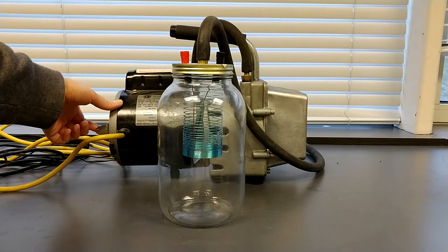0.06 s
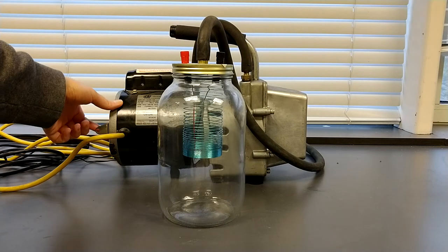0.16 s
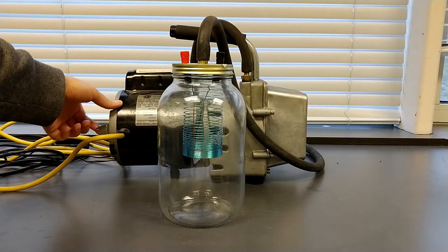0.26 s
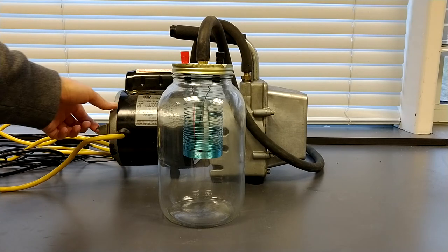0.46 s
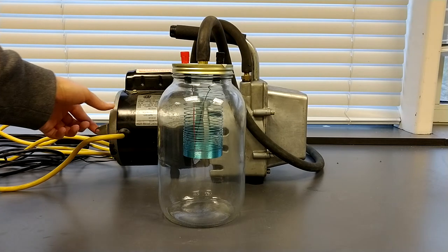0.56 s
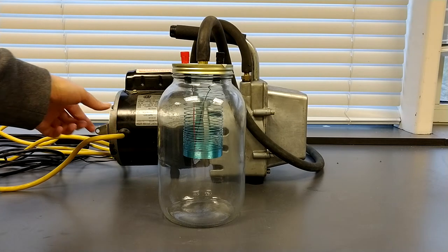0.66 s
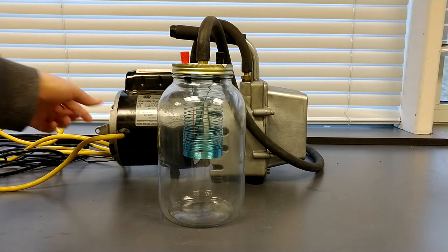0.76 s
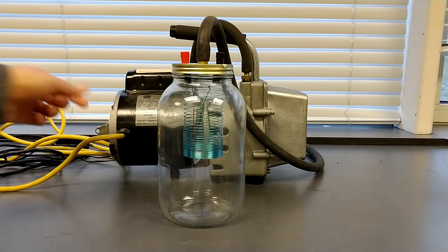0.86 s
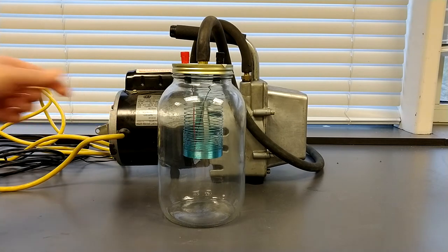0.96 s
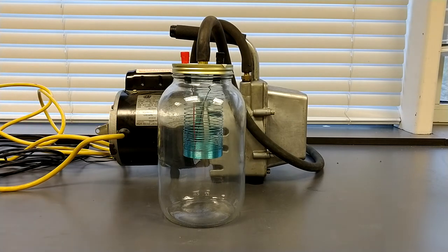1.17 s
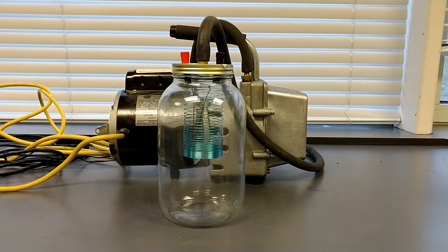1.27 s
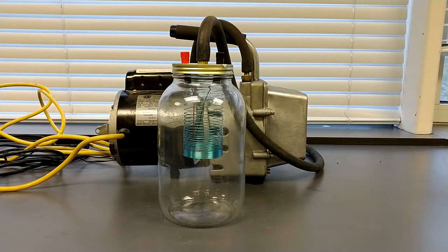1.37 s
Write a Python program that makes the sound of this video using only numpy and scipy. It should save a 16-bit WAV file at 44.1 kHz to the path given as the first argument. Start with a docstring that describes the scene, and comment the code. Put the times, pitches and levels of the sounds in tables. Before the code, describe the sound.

Close up in a quiet room, an electric vacuum pump jolts into motion with a burst of metallic clatter, then runs more softly, humming and ticking rapidly while its gurgle and hiss ease off.

```python
"""A soft switch thump, a scrape, then a loud rattle: a rotary vane vacuum pump gulps its first air.
It settles on its bench in a quiet room. The vanes drone and throb, oil churns in the ringing casing,
and the exhaust fizzes while its valve ticks about once a turn (two vane strokes).
Layers are built as a direct and a diffuse channel, then spread to left and right."""
import sys
import numpy as np
from scipy import signal
from scipy.fft import rfft, irfft, next_fast_len
from scipy.io import wavfile
from scipy.ndimage import map_coordinates

SR = 44100
rng = np.random.default_rng(int(sys.argv[2]) if len(sys.argv) > 2 else 0)


def output_pcm(signal):
    """Save a mono or channel-first signal as 16-bit PCM at the path in sys.argv[1].

    Samples are clipped to [-1, 1] before scaling.
    """
    pcm = np.clip(np.atleast_2d(signal).T, -1, 1) * 32767
    wavfile.write(sys.argv[1], SR, np.round(pcm).astype(np.int16))


N = 61739

# Swell of the start-up clatter: time_s, mid_db, upper_mid_db, treble_db
RATTLE_SWELL = [(.10, -99, -110, -110), (.143, -78, -83, -93), (.17, -53.5, -61, -63),
                (.195, -64, -50, -45), (.23, -47.5, -49.5, -52.5), (.243, -36.5, -30, -35),
                (.27, -28, -26, -27.5), (.3, -25.5, -35, -32), (.345, -26.5, -28, -35.5),
                (.372, -27.5, -35, -31), (.395, -33, -42.5, -40), (.45, -41.5, -50, -46),
                (.6, -52, -85, -94)]
# Broad, hard clatter colour: freq_hz, level_db
RATTLE_EQ = [(250.0, -15.5), (420.0, -32), (600.0, 2.5), (1000.0, -6.5), (1400.0, -13), (1800.0, -2.5),
             (2200.0, -5), (2800.0, -3), (3600.0, -4), (4400.0, -1.5), (5400.0, -14), (7200.0, -10),
             (9000.0, -19.5), (11000.0, -16), (14000.0, -20), (15500.0, -29)]
# Hard knocks within the clatter: start_s, level_db
KNOCK_HITS = [(.287, -18.5), (.2935, -21), (.3145, -23), (.3345, -22), (.340, -22.5), (.357, -26)]
# Clanky knock colour: freq_hz, level_db
KNOCK_EQ = [(300, -22.5), (600, -12.5), (900, -6), (1400, 7.5), (1750, -7.5), (2100, 5), (2450, -2.5),
            (2850, 2.5), (3200, -3), (3800, -6), (4800, -18), (7200, -3.5), (9000, -21), (14000, -23),
            (15500, -36)]
def rattle(ring_db=.5, body_db=-3.5, low_hz=2400, high_hz=4800):
    """The first gulp of air: dense clatter and a few hard knocks ring the casing."""
    mid, upper_mid, treble = amp(curves(RATTLE_SWELL))
    impacts = grains(12000, spread_db=0.5)
    clatter = amp(body_db) * coloured(impacts, RATTLE_EQ)
    clatter += amp(ring_db) * casing(impacts, settled=False)
    below = lambda hz, edge_hz: 1 / (1 + (hz / edge_hz) ** 10)
    bands = mid * unit(filtered(clatter, lambda hz: below(hz, low_hz)))
    bands += upper_mid * unit(filtered(clatter, lambda hz: below(hz, high_hz) - below(hz, low_hz)))
    bands += treble * unit(filtered(clatter, lambda hz: 1 - below(hz, high_hz)))
    knocks = noise() * bursts(KNOCK_HITS, decay_s=0.005, attack_s=0.0018)
    return bands + amp(6) * coloured(knocks, KNOCK_EQ) + amp(2.5) * casing(knocks, settled=False)


# Double clack that ends the start-up: start_s, level_db
CLACK_HITS = [(.3635, -19), (.369, -26)]
# Bright clack colour: freq_hz, level_db
CLACK_EQ = [(2000, -11), (4800, -17), (6000, 2), (8500, 2), (9500, -3), (11000, -5), (12300, -1),
            (13800, -1), (15500, -16)]
def clacks():
    """The pump breaks free with two bright clacks."""
    return coloured(noise() * bursts(CLACK_HITS, decay_s=0.0056, attack_s=0.00087), CLACK_EQ)


# Rasps leading into the rattle: start_s, level_db
SCRAPE_HITS = [(.187, -37.5), (.197, -35.5), (.212, -54), (.2355, -22), (.244, -23.5)]
# Narrow, bright rasp colour: freq_hz, level_db
SCRAPE_EQ = [(2000, -18), (3300, -31), (3700, -3.5), (3850, 1), (4150, -11), (6000, -46)]
def scrapes():
    """The motor scrapes as it takes hold, ringing one part of the casing."""
    return coloured(noise() * bursts(SCRAPE_HITS, decay_s=0.0061, attack_s=0.0012), SCRAPE_EQ)


# Ticks of the switch, then the exhaust valve: start_s, level_db
TICK_HITS = [(.147, -55.5), (.164, -42.5), (.174, -47), (0.4143, -31), (0.478, -31), (0.508, -36),
             (0.577, -33), (0.6086, -38), (0.6318, -33.5), (0.6748, -27.5), (0.71, -29.5), (.746, -43),
             (0.7826, -28.5), (0.8007, -30.5), (0.8378, -23), (.873, -31), (0.9088, -25), (0.9462, -27.5),
             (0.9807, -27), (1.0179, -23.5), (1.0535, -25), (1.0889, -29), (1.1249, -26.5), (1.161, -24.5),
             (1.1957, -27), (1.232, -27.5), (1.2673, -24)]
# Crisp tick colour: freq_hz, level_db
TICK_EQ = [(1500, 3.5), (2300, -3), (2850, 3), (3900, 0.5), (4800, 4.5), (5900, -1.5), (6600, 9.5),
           (7300, 5.5), (8500, 7.5), (9600, 0.5), (11200, 0.5), (12300, -2.5), (13500, 2.5), (15500, -13)]
def ticks(snap_db=9, wall_db=-9.5, reseat_db=-14, ring_db=-7, wall_s=.003, reseat_s=.0255):
    """Each tick is a sharp snap, the wall's answer and a soft reseating; all ring the valve."""
    later = lambda delay_s: [(s + delay_s, db) for s, db in TICK_HITS]
    direct_only = np.array([[1], [0]])
    snap = amp(snap_db) * bursts(TICK_HITS, decay_s=.0009, attack_s=.0005) * direct_only
    wall = amp(wall_db) * bursts(later(wall_s), decay_s=.008, attack_s=.0005)
    reseat = amp(reseat_db) * bursts(later(reseat_s), decay_s=.0023, attack_s=.00097)
    clicks = noise() * (snap + wall + reseat)
    return coloured(clicks, TICK_EQ) + amp(ring_db) * valve(clicks)


# Spin-up of the pump: time_s, stroke_rate_hz
SPIN_UP = [(0.15, 5), (.3, 36), (.4, 46), (.45, 50.5), (.5, 53), (.6, 54.4), (.72, 55.15), (1.0, 55.4),
           (1.4, 55.5)]
# Partials of the vane strokes: harmonic_number, relative_db
VANE_PARTIALS = [(1, 2), (2, 2), (3, 0), (5, -3), (6, -9), (8, -6), (9, -11), (10, 1), (11, -8), (12, -.5),
                 (13, -1), (14, 0), (15, .5), (16, -.5), (17, 0), (18, -9), (21, -10), (23, -3), (24, -5),
                 (25, -1), (29, -8), (30, 2), (31, -7)]
# Swell of the low hum and the whirr above it: time_s, hum_db, whirr_db
DRONE_SWELL = [(.15, -70, -80), (.3, -55, -58), (.45, -50, -50), (.52, -47, -42.5), (.6, -45, -42),
               (.75, -46, -42.5), (1.0, -46, -42.5), (1.25, -46, -43), (1.4, -46, -45)]
WAVER_DEPTH = .2  # share of a tone's amplitude
def drone(hum_partials=5, jitter_strokes=.002, panel_hz=700, panel_width_hz=9, panel_db=11):
    """Vane strokes make a hum and a whirr; partials swell as they meet a panel's resonance."""
    phase = 2 * np.pi * (strokes() + jitter_strokes * wobble(25.9))
    stroke_hz, = curves(SPIN_UP)
    hum, whirr = amp(curves(DRONE_SWELL))
    partials = []
    for harmonic, db in VANE_PARTIALS:
        panel = amp(panel_db / (1 + ((harmonic * stroke_hz - panel_hz) / panel_width_hz) ** 2))
        waver = 1 + WAVER_DEPTH * wobble(15.63)
        partials.append(amp(db) * panel * waver * np.cos(harmonic * phase + 2 * np.pi * rng.random()))
    return hum * unit(sum(partials[:hum_partials])) + whirr * unit(sum(partials[hum_partials:]))


# Weight of the throb: time_s, level_db
THROB_SWELL = [(.38, -39), (.41, -35.5), (.46, -42), (.5, -36), (.68, -35.5), (.73, -44), (.81, -44),
               (.85, -37.5), (1.02, -40), (1.11, -36), (1.27, -37), (1.4, -38.5)]
def throb(start_s=.3748, cycle_s=.0887, lag_s=.036, pitch_hz=143, half_length_s=.0095):
    """Soft low beats of the pump, a limping pair in each slow cycle."""
    first_beats = np.arange(start_s, N / SR, cycle_s)
    age = clock() - np.concatenate([first_beats, first_beats + lag_s])[:, None]
    beats = np.exp(-(age / half_length_s) ** 2 / 2) * np.cos(2 * np.pi * pitch_hz * age)
    return amp(curves(THROB_SWELL)[0]) * beats.sum(0)


# Churn easing off as the pump settles: time_s, level_db
CHURN_SWELL = [(.4, -37.5), (.44, -35), (.6, -37), (.9, -40.5), (1.25, -45), (1.4, -48)]
# Hollow churn colour: freq_hz, level_db
CHURN_EQ = [(150, -22.5), (270, -5), (400, -18), (560, -9), (720, -1), (880, -3), (1100, -5.5), (1380, 4),
            (1650, -11.5), (1850, -9.5), (2100, -2.5), (2600, -45.5), (4000, -56.5)]
def churn(pulse_db=4, body_db=-4, ring_db=-6):
    """Oil and air slap about, surging twice a stroke, and ring the casing."""
    surge = amp(pulse_db * np.cos(4 * np.pi * strokes()))
    slaps = unit(grains(4000, spread_db=0.5) * surge) * amp(curves(CHURN_SWELL)[0]) * running()
    return amp(body_db) * coloured(slaps, CHURN_EQ) + amp(ring_db) * casing(slaps, settled=True)


# Fade of the exhaust hiss: time_s, level_db
HISS_FADE = [(0.4, -43.5), (0.744, -43.5), (1.108, -55), (1.27, -52), (1.4, -54.5)]
# Fizzy hiss colour: freq_hz, level_db
HISS_EQ = [(2000.0, -8), (2400.0, 3.5), (2900.0, 4.5), (3500.0, -6), (4400.0, 9.5), (5200.0, -12),
           (5900.0, -4), (6500.0, 2), (7300.0, 5), (8500.0, -17), (9600.0, -0.5), (11000.0, -2),
           (13500.0, -3), (14700.0, -5), (15500.0, -52)]
def exhaust(trim_db=2, turn_db=1.0, stroke_db=1.0, ring_db=-8):
    """Fizzing exhaust air swells with each turn, puffs with each stroke and rings the valve."""
    phase = 2 * np.pi * strokes()
    puff = amp(turn_db * np.cos(phase / 2) + stroke_db * np.cos(phase))
    air = unit(grains(5700, spread_db=5.0) * puff) * amp(curves(HISS_FADE)[0] + trim_db) * running()
    return coloured(air, HISS_EQ) + amp(ring_db) * valve(air)


# Ring of the casing: pitch_hz, width_hz, rattled_db, settled_db
CASING_MODES = [(570, 20, -6, -5), (698, 22, -6, -4), (845, 50, -14, -11), (1268, 18, -2, -7),
                (1320, 18, -1, -12), (1362, 18, 5, 2), (1418, 18, 4, -4), (1455, 18, 1, -11),
                (1525, 18, 3, -11), (1667, 22, -14, -4), (2062, 18, -4, -14), (2117, 18, -3, -8),
                (2838, 18, 4, -7), (3507, 15, 1, -14), (3548, 15, 3, -14), (3770, 60, -8, -22),
                (4288, 25, -10, -17), (5720, 40, -13, -17), (6495, 28, -8, -13), (7244, 45, -8, -11),
                (7630, 50, -12, -22), (8460, 60, -13, -10)]
def casing(drive, settled):
    """The casing rings when struck; its narrower resonances last longer."""
    t = clock()[:SR // 4]
    ring = 0
    for hz, width_hz, rattled_db, settled_db in CASING_MODES:
        gain = amp(settled_db if settled else rattled_db) * width_hz
        ring += gain * np.exp(-np.pi * width_hz * t) * np.cos(2 * np.pi * hz * t)
    return excite(ring, drive)


# Ring of the exhaust valve: pitch_hz, level_db, t60_s
VALVE_MODES = [(2880, 0, .04), (3420, -2, .02), (5870, 3, .04), (6490, -6, .04), (7246, -3, .04),
               (8490, 1, .03), (8700, 0, .03)]
def valve(drive):
    """The exhaust valve answers with a brief, high ring."""
    t = clock()[:SR // 8]
    ring = sum(amp(db - 60 * t / t60) * np.sin(2 * np.pi * hz * t) for hz, db, t60 in VALVE_MODES)
    return excite(ring, drive)


# Pings of the motor housing: start_s, pitch_hz, level_db
JOLT_PINGS = [(.164, 1222, -45.5), (.178, 602, -42.5)]
def jolts():
    """The motor housing pings softly as it jerks into motion."""
    return sum(bursts([(s, db)], decay_s=.019, attack_s=.002) * np.sin(2 * np.pi * hz * (clock() - s))
               for s, hz, db in JOLT_PINGS)


# Whines off the harmonic series, at full speed: pitch_hz, level_db
WHINE_TONES = [(572, -54), (991, -50)]
def whine(start_s=.52, rise_s=.25):
    """Two thin motor tones follow the speed and fade in as it levels off."""
    motor_time = strokes() / SPIN_UP[-1][1]
    tone = lambda hz: unit((1 + WAVER_DEPTH * wobble(9.5)) * np.sin(2 * np.pi * hz * motor_time))
    return fade_in(start_s, rise_s) * sum(amp(db) * tone(hz) for hz, db in WHINE_TONES)


# Thumps of the switch and the motor taking hold: start_s, level_db
THUMP_HITS = [(.107, -42.5), (.117, -60), (.146, -41.5), (.188, -32)]
# Dull thump colour: freq_hz, level_db
THUMP_EQ = [(40, -20), (110, 4), (160, 7.5), (300, -12.5), (480, -15.5), (620, -2.5), (750, -15),
            (1200, -21), (2500, -37), (9000, -45)]
# Low rumble colour: freq_hz, level_db
RUMBLE_EQ = [(35, -55), (60, -10), (95, 0.5), (120, -5.5), (150, 3.5), (175, 3.5), (195, -5), (250, -1.5),
             (380, -9.5), (600, -28.5)]
def bench(rumble_db=-43):
    """The bench takes the thumps of starting, then rumbles under the motor."""
    rumble = amp(rumble_db) * fade_in(start_s=0.14, rise_s=0.11) * coloured(noise(), RUMBLE_EQ)
    thumps = noise() * bursts(THUMP_HITS, decay_s=0.016, attack_s=0.0039)
    return rumble + coloured(thumps, THUMP_EQ)


# Dark room tone: freq_hz, level_db
AIR_EQ = [(25, -28), (50, -11), (90, -8), (130, -2.5), (160, 9), (200, -11.5), (250, -2.5), (380, -19),
          (600, -25), (1400, -35.5), (2200, -43), (5000, -44), (15000, -52.5)]
def room_air(level_db=-52.5):
    """The room's own steady murmur of air."""
    return amp(level_db) * unit(coloured(noise(), AIR_EQ))


# Decay of the room: freq_hz, t60_s
ROOM_DECAY = [(200, 0.27), (2000, 0.065), (12000, 0.027)]
def room_tail(x):
    """Short diffuse reflections whose treble dies first."""
    hz, t, spectrum = signal.stft(rng.standard_normal((2, SR // 2)), SR, nperseg=256)
    decay = amp(-60 * t / along(ROOM_DECAY, hz)[:, None])
    tail = signal.istft(spectrum * decay, SR, nperseg=256)[1]
    return signal.fftconvolve(x, tail / np.linalg.norm(tail[0]), axes=1)[:, :N]


# Likeness of left and right: freq_hz, coherence
STEREO_LIKENESS = [(60, 0.85), (170, 0.99), (320, 0.76), (550, 0.81), (1400, 0.96), (2000, 0.078),
                   (2350, 0.74), (2900, 0.35), (3550, 0.89), (4000, 0.063), (4500, 1), (5400, 0.16),
                   (7200, 0.29), (10000, 0.18), (14000, 0.52)]
# Lean of the image: freq_hz, left_minus_right_db
STEREO_BALANCE = [(50, 10), (100, 9), (190, 7), (380, 2.5), (1100, 1), (1700, 6), (2050, -1.5),
                  (3500, -0.5), (4600, 0.5), (6000, 5.5), (7400, 8.5), (9000, 7), (11000, 1.5), (14000, -2)]
# Phase between the sides: freq_hz, left_lead_rad
STEREO_PHASE = [(60, -2.2), (110, -1.55), (400, -1.35), (600, -.1), (1400, 0), (1850, .2), (2300, 3.2),
                (2700, 3.4), (3050, 6.3), (3900, 6.4), (4200, 9.3), (5300, 9.6), (5800, 12.9), (7000, 16),
                (8300, 19.2), (9600, 15.7), (10600, 12.6), (12000, 9.5), (13300, 6.3), (14300, 3.3)]
def spread(pair):
    """Direct sound becomes the mid, diffuse sound the side; each band leans left or right."""
    def width(hz):
        angle = np.arccos(np.clip(along(STEREO_LIKENESS, hz), 0, .99)) / 2
        return np.array([np.cos(angle), np.sin(angle)])

    def pan(hz):
        lean = amp(np.outer([.5, -.5], along(STEREO_BALANCE, hz)))
        shift = np.exp(1j * np.outer([.5, -.5], along(STEREO_PHASE, hz)))
        return shift * lean / np.sqrt((lean ** 2).mean(0))

    mid, side = filtered(pair, width)
    return filtered(np.array([mid + side, mid - side]), pan)


def strokes():
    """Count of vane strokes so far."""
    return np.cumsum(curves(SPIN_UP)[0]) / SR


def running():
    """Fade-in as the pump gets going."""
    return fade_in(start_s=0.28, rise_s=0.045)


def fade_in(start_s, rise_s):
    """Straight ramp from 0 to 1."""
    return np.clip((clock() - start_s) / rise_s, 0, 1)


def bursts(hits, decay_s, attack_s):
    """Envelope of blows that rise quickly and die away, summed in power."""
    hits = np.array(hits)
    age = np.maximum(clock() - hits[:, :1], 0)
    each = amp(hits[:, 1:]) * np.exp(-age / decay_s) * (1 - np.exp(-age / attack_s))
    return np.sqrt((each ** 2).sum(0))


def grains(per_second, spread_db):
    """Tiny random impacts of uneven size, rms 1."""
    impacts = noise() * (rng.random(N) < per_second / SR)
    sizes = amp(spread_db * np.clip(rng.standard_normal(N), -2, 2))
    return unit(impacts * sizes)


def noise():
    """Two unrelated white noises."""
    return rng.standard_normal((2, N))


def wobble(rate_hz):
    """A smooth random curve with rate_hz knots a second."""
    return map_coordinates(rng.standard_normal(int(N * rate_hz / SR) + 4), [clock() * rate_hz])


def coloured(x, eq, size=4096):
    """Shape x with an EQ curve scaled to unit energy."""
    gain = amp(along(eq, np.fft.rfftfreq(size, 1 / SR)))
    cepstrum = irfft(np.log(gain + 1e-6))
    # Minimum phase: nothing rings ahead of a hit.
    cepstrum[1:size // 2] *= 2
    cepstrum[size // 2 + 1:] = 0
    return excite(irfft(np.exp(rfft(cepstrum))), x)


def excite(ring, drive):
    """Play drive through an impulse response scaled to unit energy."""
    return signal.fftconvolve(drive, ring[None] / np.linalg.norm(ring), axes=1)[:, :N]


def filtered(x, response):
    """Multiply the spectrum of x by response(hz)."""
    size = next_fast_len(N + SR // 2)
    return irfft(rfft(x, size) * response(np.fft.rfftfreq(size, 1 / SR)), size)[..., :N]


def along(points, hz):
    """Read (freq_hz, value) points on a log axis."""
    freqs, values = np.transpose(points)
    return np.interp(np.log(hz + 1), np.log(freqs + 1), values)


def curves(rows):
    """One value per sample for each column after the time."""
    times, *columns = np.transpose(rows)
    return [np.interp(clock(), times, column) for column in columns]


def clock():
    """Time of each sample in seconds."""
    return np.arange(N) / SR


def amp(db):
    """Decibels to gain."""
    return 10 ** (np.asarray(db) / 20)


def unit(x):
    """Scale to rms 1."""
    return x / np.sqrt(np.mean(x ** 2) + 1e-20)


def scene(reverb_db=-12.5):
    """The pump's noises with their room tail, its dry tones, the bench and the room's air."""
    noises = scrapes() + rattle() + clacks() + churn() + exhaust() + ticks()
    air = room_air()
    direct_tones = np.array([jolts() + drone() + whine() + throb(), np.zeros(N)])
    return spread(noises + amp(reverb_db) * room_tail(noises) + direct_tones + bench() + air)


def record(dry, low_cut_hz=36, top_hz=15600):
    """The microphone drops the deepest bass and keeps nothing above its band limit."""
    return filtered(dry, lambda hz: (hz < top_hz) * (1 - 1 / (1 + (hz / low_cut_hz) ** 6)))


dry = scene()
out = record(dry)
output_pcm(out)
```